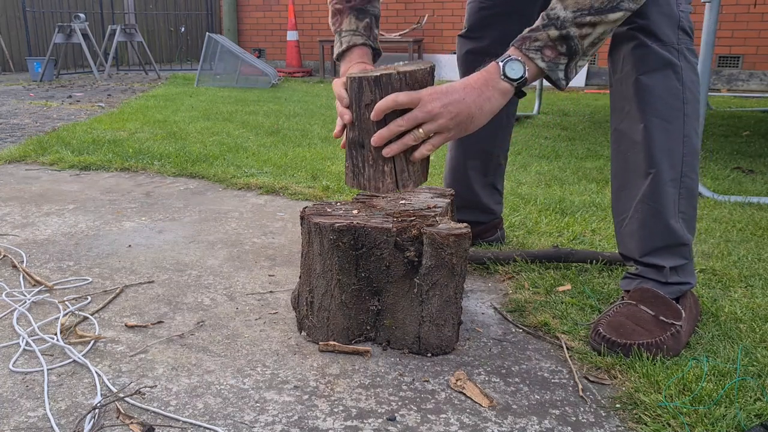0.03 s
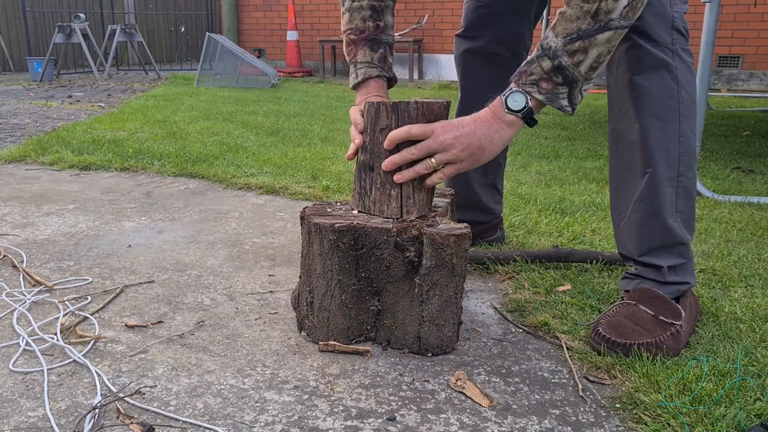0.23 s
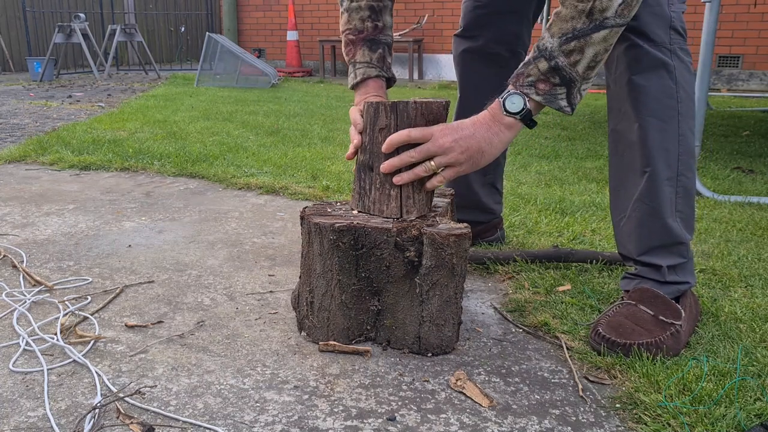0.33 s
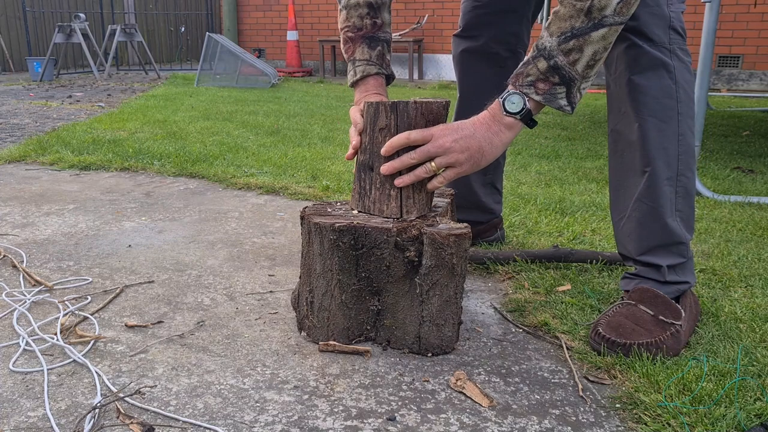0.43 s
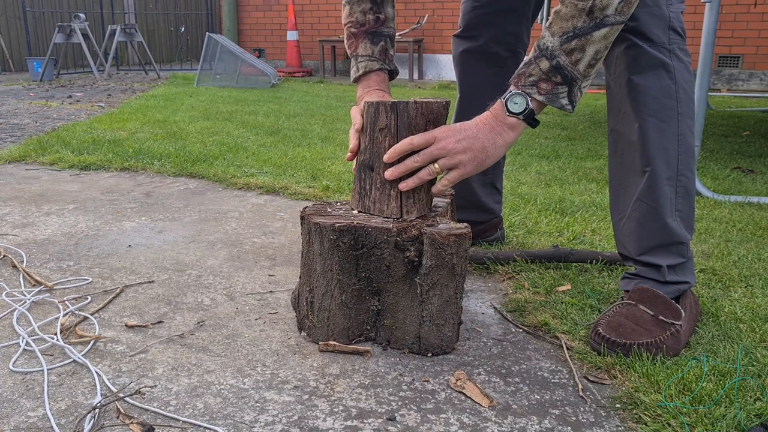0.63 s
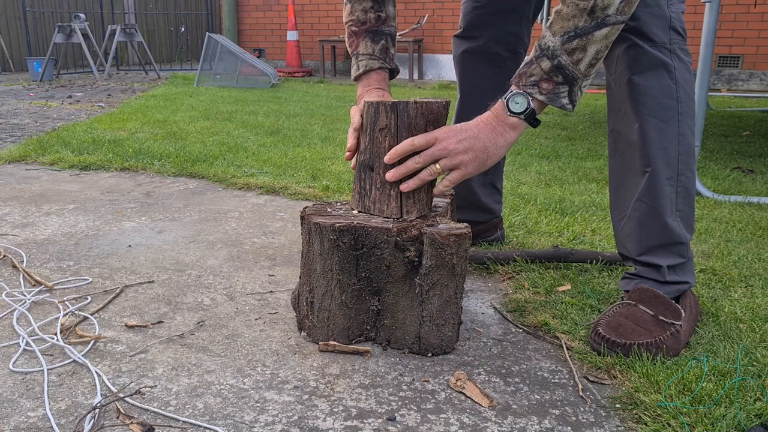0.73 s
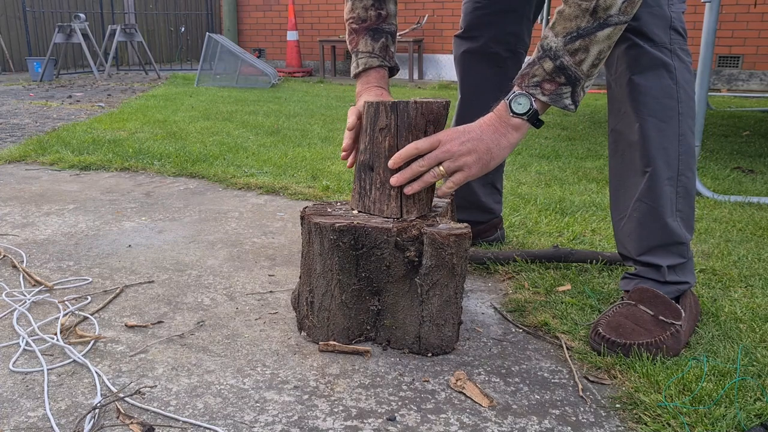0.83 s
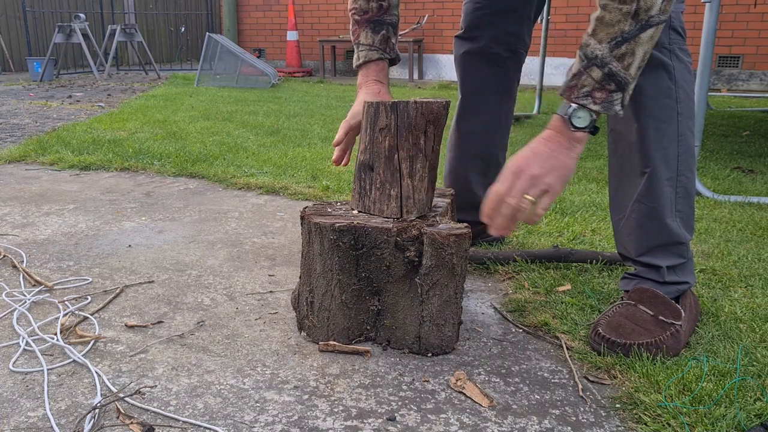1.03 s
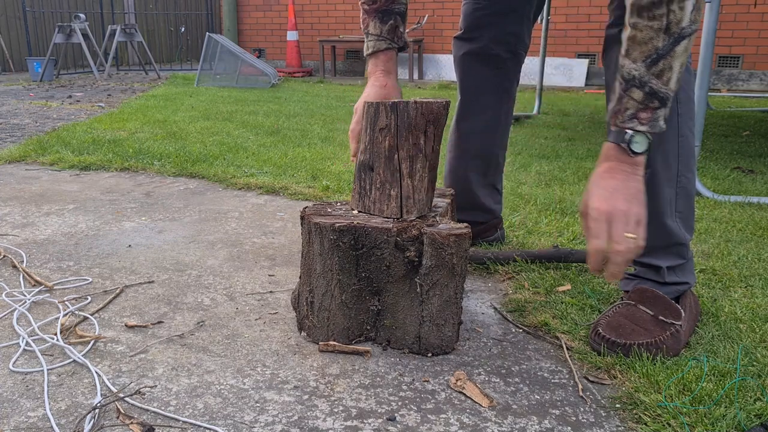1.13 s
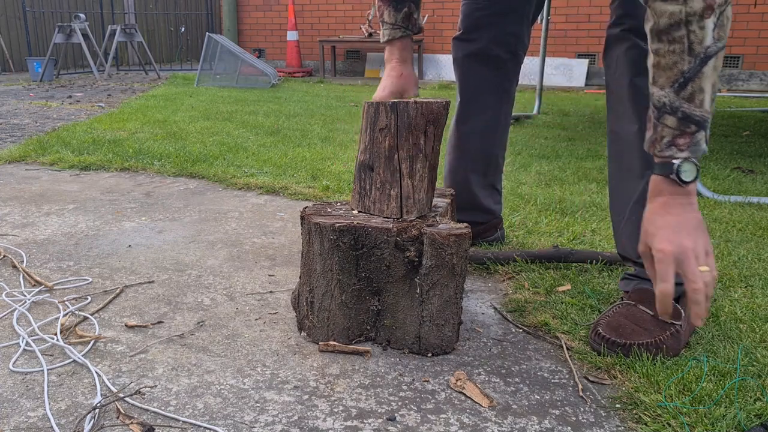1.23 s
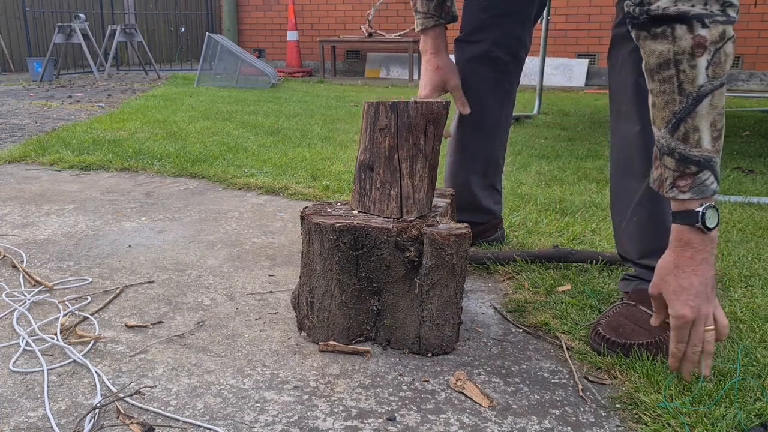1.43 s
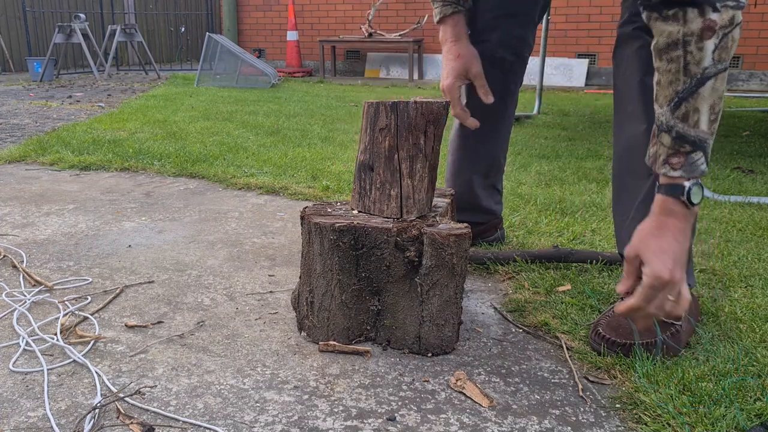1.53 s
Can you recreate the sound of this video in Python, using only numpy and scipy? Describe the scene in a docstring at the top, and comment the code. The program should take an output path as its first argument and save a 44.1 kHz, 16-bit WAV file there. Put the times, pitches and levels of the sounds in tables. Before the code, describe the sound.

A solid wooden knock at about 0.22 seconds: a short log lands on a chopping stump, rocks and drops flat with a low thud by 0.3, bark crumbs crackling briefly. The dry, close hit has a short yard reflection. Quiet outdoor air and far traffic rumble continue, with faint hiss around 0.6 to 1.1, a tiny high chirp near 0.9, and distant warbling bird whistles from 1.1 to 1.55.

```python
"""A short log is set on end on a chopping stump in a quiet backyard: its rim lands with a knock, it rocks
onto a hard edge and drops flat with a thud. Band-limited impulses excite the damped modes of the wood.
Bark crumbs crush under it as bursts of dense random impulses; noise tails give the yard's reflections.
Far traffic rumbles and a faint hiss comes and goes, both as filtered noise.
Distant birds call: gliding, warbling sine whistles and one thin high call of narrow-band noise."""
import sys
import numpy as np
from scipy import signal
from scipy.fft import rfft, irfft
from scipy.io import wavfile

SR = 44100
rng = np.random.default_rng(int(sys.argv[2]) if len(sys.argv) > 2 else 0)


def wav_out(sig):
    """Save sig, one row per channel (or a flat mono array), as 16-bit PCM at SR to the path in sys.argv[1]."""
    wavfile.write(sys.argv[1], SR, np.round(np.clip(np.atleast_2d(sig).T, -1, 1) * 32767).astype(np.int16))


N = 70560  # length [samples]
T = np.arange(N) / SR  # time [s]
OPPOSITE = np.array([[1], [-1]])  # left and right in opposite polarity


def from_db(db):
    """Amplitude gain is ten to the power of a twentieth of the decibels."""
    return 10 ** (np.asarray(db) / 20)


def rms_one(x):
    """Normalisation: dividing by the root mean square gives unit rms."""
    return x / np.sqrt(np.mean(x ** 2) + 1e-20)


def pan(db):
    """Intensity stereo: left and right gains share a level difference, left minus right, equally."""
    return from_db(np.array([[0.5], [-0.5]]) * db)


def level(rows):
    """Amplitude envelope: (time [s], level [dB]) points joined linearly in decibels."""
    return from_db(np.interp(T, *np.transpose(rows)))


def at_hz(points):
    """Logarithmic frequency scale: a (frequency [Hz], value) table read at every Fourier bin."""
    hz, value = np.transpose(points)
    bins_hz = np.fft.rfftfreq(N, 1 / SR)
    return np.interp(np.log(bins_hz + 1), np.log(hz), value)  # + 1 avoids log(0)


def colour(x, points):
    """Spectral shaping: each Fourier bin is weighted by a (frequency [Hz], gain [dB]) table."""
    return irfft(rfft(x) * from_db(at_hz(points)), N)


def cut(x, hz, kind, order):
    """Butterworth high- or low-pass: maximally flat within its passband."""
    return signal.sosfilt(signal.butter(order, hz, kind, fs=SR, output="sos"), x)


def burst(start, attack, decay):
    """Transient envelope: linear rise, then exponential fall with the given time constant [s]."""
    rise = np.clip((T - start) / attack, 0, 1)
    fall = np.exp(-np.maximum(T - start - attack, 0) / decay)
    return rise * fall


# left-right correlation of diffuse sound: (frequency [Hz], correlation [-1 to 1])
STEREO_LIKENESS = [(30, 0.72), (110, 0.99), (200, 0.89), (380, .66), (700, 0.15), (1250, -0.55),
                   (2400, 0.39), (4400, 0.13), (8000, -0.66), (15000, 0.62)]
# stereo balance of diffuse sound: (frequency [Hz], left minus right [dB])
STEREO_BALANCE = [(60, -1.1), (500, -1.2), (2000, -1.5), (5000, -2), (9000, 0.5), (15000, -0.5)]


def diffuse_noise():
    """Diffuse field: independent mid and side noises, weighted by frequency, set left-right correlation."""
    mid, side = rfft(rng.standard_normal((2, N)))
    alike = at_hz(STEREO_LIKENESS)
    shared = np.sqrt(1 + alike) * mid
    opposed = np.sqrt(1 - alike) * side * OPPOSITE
    return irfft((shared + opposed) * pan(at_hz(STEREO_BALANCE)), N)


def narrow_noise(hz, width_hz):
    """Band-pass filtering: diffuse noise confined to one band, at unit rms."""
    edges = [hz - width_hz / 2, hz + width_hz / 2]
    band = signal.butter(2, edges, "band", fs=SR, output="sos")
    return rms_one(signal.sosfilt(band, diffuse_noise()))


# spectrum of the steady outdoor air: (frequency [Hz], relative spectral level [dB])
AIR_COLOUR = [(13, -54), (22, -16.5), (80, 0), (124, -6), (154, -11), (187, -12.5), (233, -13.5),
              (450, -19.5), (592, -19), (869, -21), (997, -21.5), (2210, -32.5), (2600, -45.5), (2910, -40),
              (3820, -40.5), (7190, -58.5), (15500, -58.5)]
AIR_DB = -51  # rms level


def air():
    """Stationary noise: diffuse noise of fixed spectrum and level."""
    return from_db(AIR_DB) * rms_one(colour(diffuse_noise(), AIR_COLOUR))


# swells of the far traffic: (time [s], level [dB])
TRAFFIC_LEVEL = [(0, -59), (0.55, -59.5), (0.85, -54), (1.17, -58), (1.37, -49), (1.6, -50.5)]
RUMBLE_HZ, RUMBLE_WIDTH_HZ = 79.8, 28.8


def traffic():
    """Amplitude modulation: a slow envelope swells a low band of noise into rumble."""
    return level(TRAFFIC_LEVEL) * narrow_noise(RUMBLE_HZ, RUMBLE_WIDTH_HZ)


# bands of the faint far hiss: (centre frequency [Hz], bandwidth [Hz], relative level [dB])
FAR_HISS_BANDS = [(1400, 480, 5), (1980, 130, -3), (2570, 196, 1.5), (3750, 370, -4), (4585, 200, -9),
                  (5790, 830, -11)]
# common gain of all the bands: (time [s], gain [dB])
FAR_HISS_LEVEL = [(0, -79.5), (0.45, -79.5), (0.63, -73), (1.02, -72.5), (1.15, -84.5), (1.6, -101)]


def hiss():
    """Incoherent superposition: independent noise bands add under one common envelope."""
    bands = sum(from_db(db) * narrow_noise(hz, width) for hz, width, db in FAR_HISS_BANDS)
    return level(FAR_HISS_LEVEL) * bands


# bark crumbs crushed under the log: (time [s], gain [dB], decay time constant [s])
BARK_CRUNCHES = [(0.2203, -50, 0.0099), (0.2252, -41.5, 0.0031), (0.2375, -53.5, 0.024),
                 (0.2546, -43.5, 0.0048), (0.2735, -62, 0.016), (0.2936, -56.5, 0.0026)]
# spectrum of the crushing: (frequency [Hz], relative spectral level [dB])
BARK_COLOUR = [(700, 6.5), (2000, 0.5), (3700, 0.5), (4700, -8.5), (6200, -7.5), (9000, -13.5),
               (16000, -15)]
CRUMBS_PER_S = 13000  # average rate in each of mid and side
CRUMB_SPREAD_DB, CRUNCH_ATTACK_S = 1, 0.0016
CRUNCH_SIDE_DB, BARK_PAN_DB = -2, 3.5


def bark():
    """Crackling noise: tiny fractures are dense random impulses, gated as the log bears down."""
    size_db = CRUMB_SPREAD_DB * np.minimum(rng.exponential(1, (2, N)), 4)
    sizes = from_db(size_db) * rng.choice([-1, 1], (2, N))
    fractures = sizes * (rng.random((2, N)) < CRUMBS_PER_S / SR)
    mid, side = rms_one(colour(fractures, BARK_COLOUR))
    crumbs = mid + from_db(CRUNCH_SIDE_DB) * side * OPPOSITE
    pressure = sum(from_db(db) * burst(s, CRUNCH_ATTACK_S, decay) for s, db, decay in BARK_CRUNCHES)
    return pressure * crumbs * pan(BARK_PAN_DB)


def ring(force, hz, t60):
    """Damped resonance: a two-pole filter whose free vibration falls 60 dB in t60 [s]."""
    radius = from_db(-60 / (t60 * SR))
    angle = 2 * np.pi * hz / SR
    poles = [1, -2 * radius * np.cos(angle), radius ** 2]
    return signal.lfilter([0, np.sin(angle)], poles, force + 1e-18)  # offset avoids vanishingly small numbers


# wood meets wood: (time [s], strength [dB], lowest pitch excited [Hz], highest pitch excited [Hz])
WOOD_CONTACTS = [(0.223, -22, 253, 1300), (0.2259, 0.5, 77.4, 211), (0.228, -10.5, 740, 1250),
                 (0.2304, 1.5, 402, 965), (0.2326, -1.5, 398, 1760), (0.2394, -5, 70.5, 283),
                 (0.2546, -14, 52.5, 644), (0.2564, -3, 1550, 5340), (0.2738, -17.5, 312, 890),
                 (0.2765, 2.5, 55, 396), (0.2930, -19, 252, 610), (0.3160, -16, 194, 330)]
# log and stump ring together: (frequency [Hz], relative level [dB], t60 [s], polarity [+1 or -1])
LOG_AND_STUMP_MODES = [(64, -26, 0.18, 1), (101, -28, 0.06, 1), (145, -21.5, 0.044, 1),
                       (275, -26.5, .022, 1), (319, -21, 0.037, 1), (413, -26, 0.0324, 1),
                       (494.6, -20, 0.03, 1), (602, -22, 0.027, 1), (883.5, -25.5, 0.026, 1),
                       (1170, -39.5, 0.027, 1), (1690, -27.5, .014, 1), (1837, -29, 0.013, -1),
                       (2320, -42, 0.023, -1), (2800, -55, 0.023, -1), (3590, -24.5, 0.013, 1),
                       (3794, -28.5, 0.013, -1), (5560, -48, 0.014, -1)]
KNOCK_LOW_CUT_HZ = 52.5  # the knock has no deep bass below this


def knock():
    """Modal excitation: a small hard edge excites the high modes, the broad face the low ones."""
    force = np.zeros(N)
    for s, db, low_hz, high_hz in WOOD_CONTACTS:
        blow = from_db(db) * signal.unit_impulse(N, int(s * SR)) + 1e-18
        without_lows = cut(blow, low_hz, "high", order=3)
        force += cut(without_lows, high_hz, "low", order=3)
    wood = np.zeros(N)
    for hz, db, t60, polarity in LOG_AND_STUMP_MODES:
        wood += np.sign(polarity) * from_db(db) * ring(force, hz, t60)
    return cut(wood, KNOCK_LOW_CUT_HZ, "high", order=4)


def echoes(x, noise, t60, delay, build):
    """Reverberation: convolution with a delayed, exponentially dying noise gives dense reflections."""
    fade = burst(delay, build, t60 / np.log(1000))  # 60 dB is a factor of 1000
    response = noise * fade / np.sqrt(np.sum(fade ** 2))
    return signal.fftconvolve(x[None], response, axes=1)[:, :N]


# reflections sideways off paving and legs: (frequency [Hz], gain [dB])
SIDEWAYS_COLOUR = [(60, -21), (200, -13), (500, -23), (1100, -5), (2000, -13), (3400, -10), (6000, -3),
                   (15000, -22)]
NEAR_T60_S, NEAR_DELAY_S, NEAR_BUILD_S = 0.023, 0.00054, 0.001


def near_reflections(x):
    """Early lateral reflections: a short noise tail reaches the two sides in opposite polarity."""
    sideways = colour(rng.standard_normal(N), SIDEWAYS_COLOUR) * OPPOSITE
    return echoes(x, sideways, NEAR_T60_S, NEAR_DELAY_S, NEAR_BUILD_S)


# sound scattered by the yard: (frequency [Hz], relative gain [dB])
SCATTER_COLOUR = [(60, -24), (200, -12), (500, -22), (1000, -18), (2500, -5.5), (3700, -17.5), (6000, -6),
                  (15000, -36)]
YARD_T60_S, YARD_DELAY_S, YARD_BUILD_S = 0.25, 0.007, 0.003


def yard_reflections(x):
    """Late scattering: fence and wall return a longer, diffuse noise tail."""
    scatter = colour(diffuse_noise(), SCATTER_COLOUR)
    return echoes(x, scatter, YARD_T60_S, YARD_DELAY_S, YARD_BUILD_S)


CHIP_S, CHIP_ATTACK_S, CHIP_DECAY_S = 0.91, 0.006, 0.07
CHIP_HZ, CHIP_WIDTH_HZ, CHIP_DB = 7630, 120, -84


def high_call():
    """Enveloped narrow-band noise: a band this thin is heard as one high, faintly pitched call."""
    envelope = burst(CHIP_S, CHIP_ATTACK_S, CHIP_DECAY_S)
    return from_db(CHIP_DB) * envelope * narrow_noise(CHIP_HZ, CHIP_WIDTH_HZ)


# whistled notes: (time [s], length [s], level before panning [dB],
#                  start frequency [Hz], middle frequency [Hz], end frequency [Hz])
WHISTLED_NOTES = [(1.088, 0.037, -66.5, 2050, 2146, 2050), (1.150, 0.053, -64, 2128, 2080, 1950),
                  (1.206, 0.026, -52.5, 2234, 2390, 2420), (1.227, 0.063, -52.5, 2417, 2424, 2387),
                  (1.286, 0.057, -59.5, 2440, 2457, 2388), (1.341, 0.056, -70, 2500, 2420, 2420),
                  (1.386, 0.0534, -56, 2404, 2430, 2387), (1.401, 0.084, -58.5, 2366, 2330, 2290),
                  (1.329, .11, -70.5, 2160, 2130, 2090), (1.447, 0.04, -60, 2016, 2100, 2045),
                  (1.499, 0.061, -70.5, 2464, 2524, 2610)]
NOTE_EDGE_S = 0.0072  # rise and fall time
WARBLE_HZ, WARBLE_CUTOFF_HZ = 20.7, 166  # rms pitch deviation, and low-pass corner of its fluctuation
BIRD_PAN_DB, BIRD_LAG_S = 3.5, 0.00013  # the whistle reaches the right side later
BIRD_ECHO_DB, BIRD_T60_S = -10, 0.7


def whistles():
    """Frequency modulation: sine phase accumulates a gliding, randomly warbling pitch, then echoes."""
    song = np.zeros(N)
    flutter = cut(rng.standard_normal(N), WARBLE_CUTOFF_HZ, "low", order=2)
    warble = WARBLE_HZ * rms_one(flutter)
    for s, length, db, start_hz, middle_hz, end_hz in WHISTLED_NOTES:
        glide = np.interp(T, [s, s + length / 2, s + length], [start_hz, middle_hz, end_hz])
        phase = 2 * np.pi * np.cumsum(glide + warble) / SR
        swell = np.clip(np.minimum(T - s, s + length - T) / NOTE_EDGE_S, 0, 1)
        song += from_db(db) * swell * np.sqrt(2) * np.sin(phase)  # sqrt(2) gives the sine unit rms
    late_song = np.interp(T - BIRD_LAG_S, T, song)
    direct = np.array([song, late_song]) * pan(BIRD_PAN_DB)
    tail = echoes(song, diffuse_noise(), BIRD_T60_S, YARD_DELAY_S, YARD_BUILD_S)
    return direct + from_db(BIRD_ECHO_DB) * tail


LOG_PAN_DB = -1


def scene():
    """Superposition: the close log, its reflections, the birds and the background add linearly."""
    backyard = air() + traffic() + hiss()
    log = bark() + knock() * pan(LOG_PAN_DB)
    log_mono = log.mean(axis=0)
    reflections = near_reflections(log_mono) + yard_reflections(log_mono)
    birds = high_call() + whistles()
    return backyard + log + reflections + birds


CUTOFF_HZ = 15900


def record(dry):
    """Elliptic low-pass: 0.1 dB passband ripple buys a steep cut of the top to 80 dB down."""
    return signal.sosfilt(signal.ellip(10, 0.1, 80, CUTOFF_HZ, fs=SR, output="sos"), dry)


dry = scene()
out = record(dry)
wav_out(out)
```